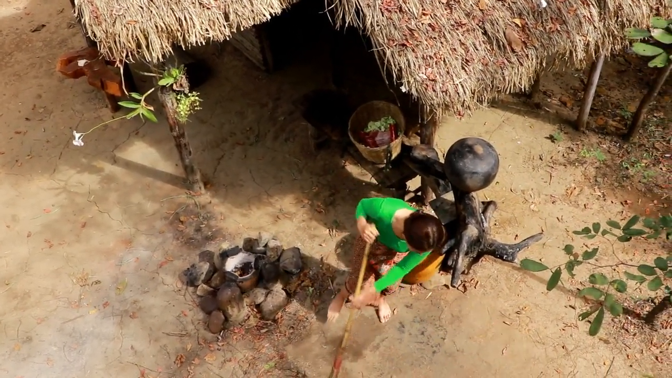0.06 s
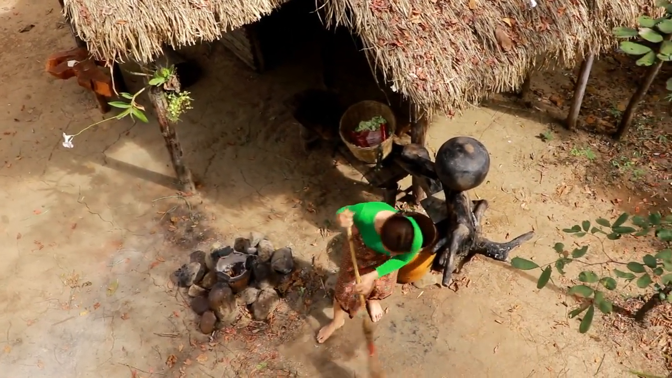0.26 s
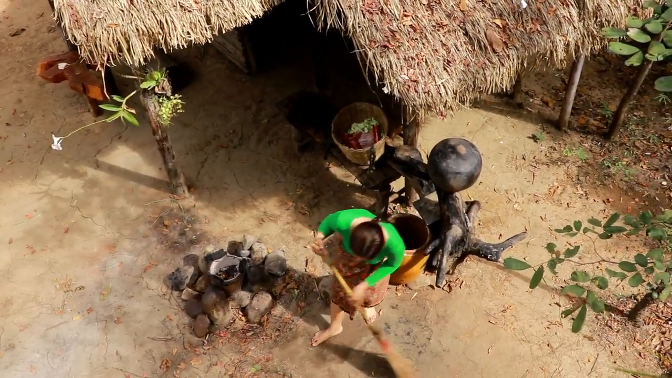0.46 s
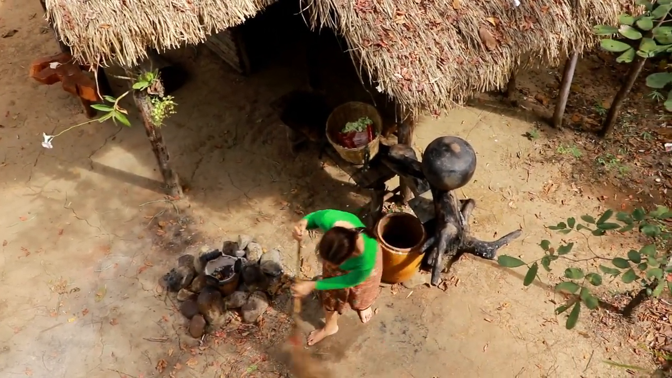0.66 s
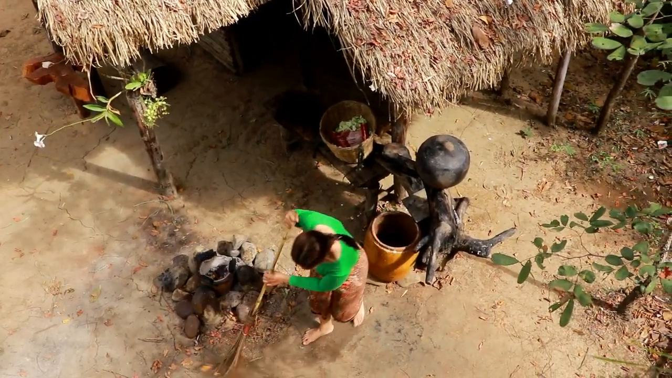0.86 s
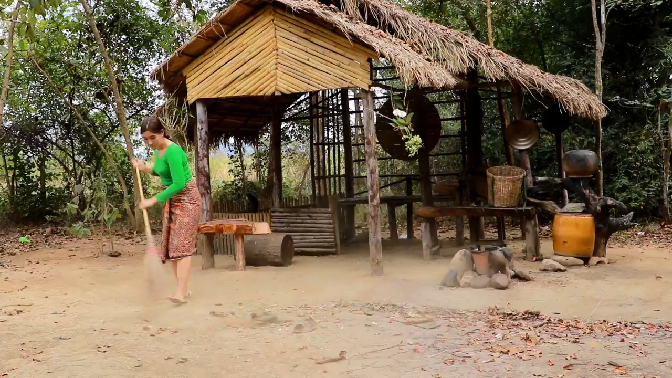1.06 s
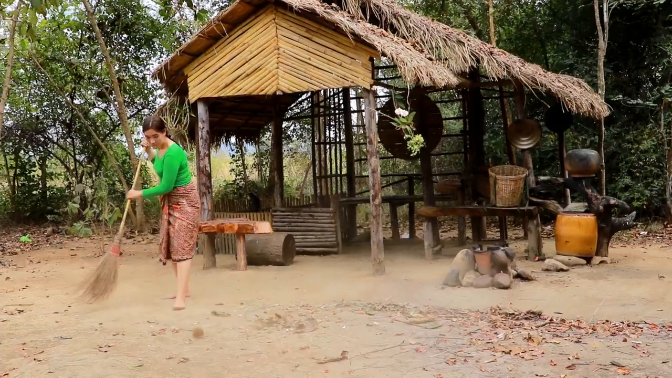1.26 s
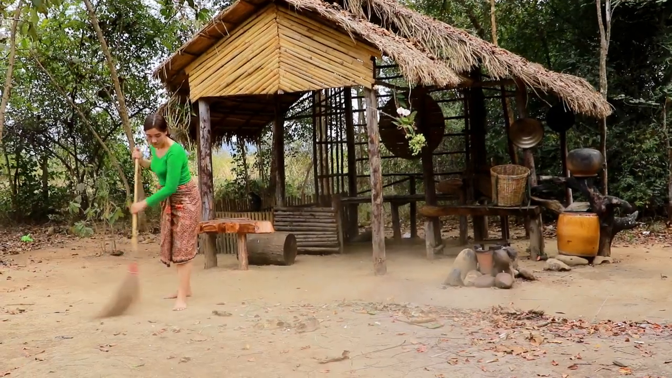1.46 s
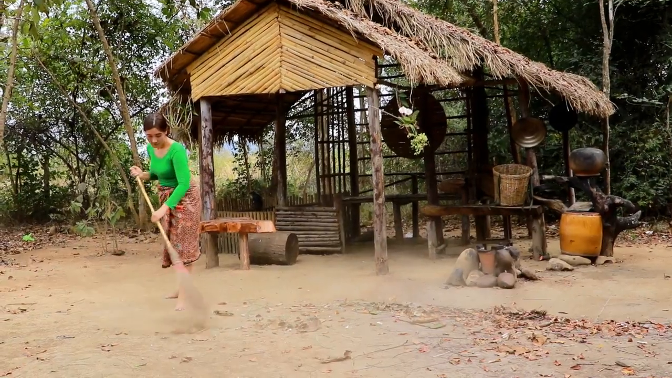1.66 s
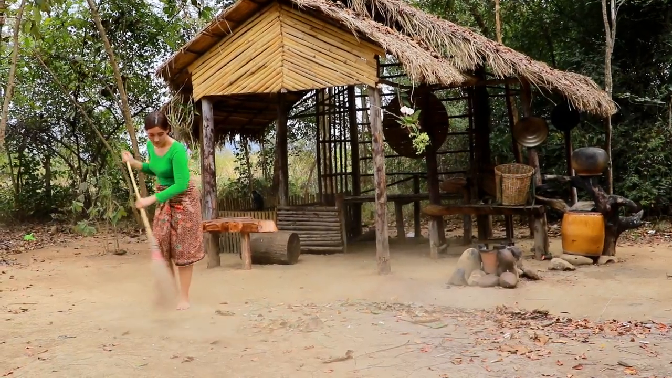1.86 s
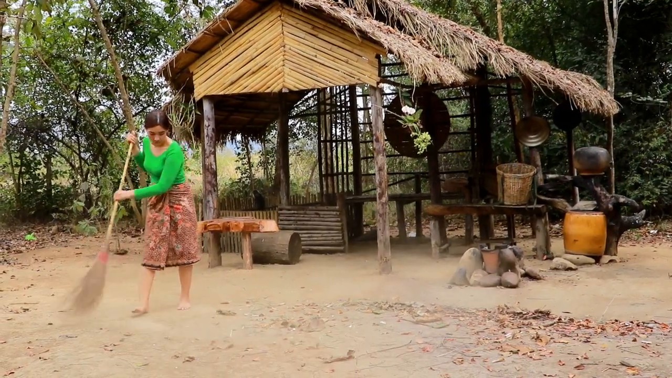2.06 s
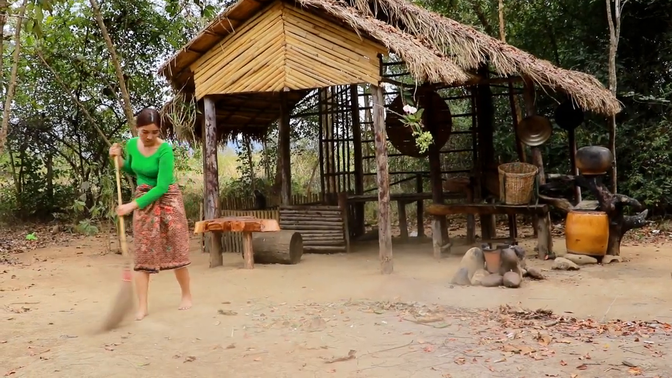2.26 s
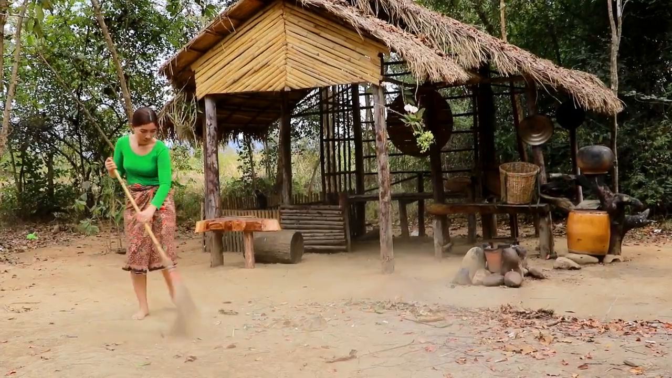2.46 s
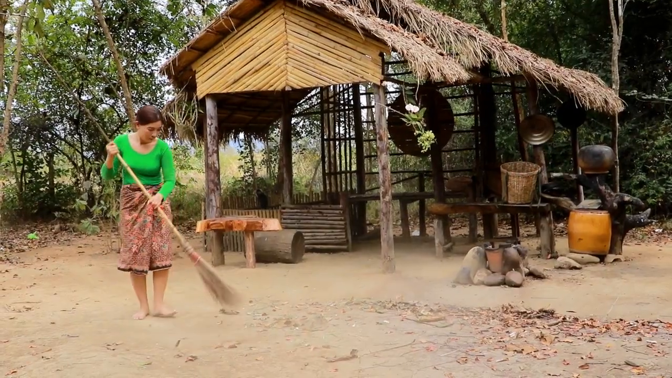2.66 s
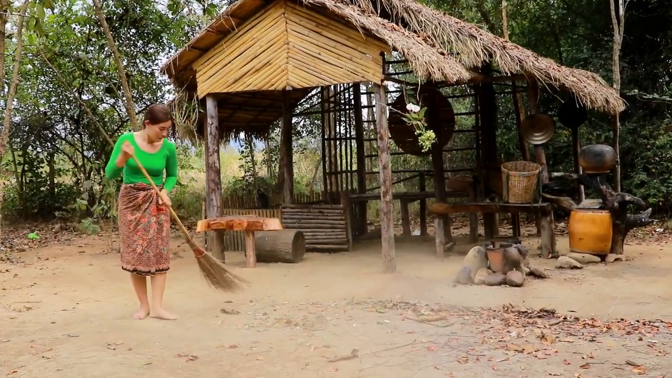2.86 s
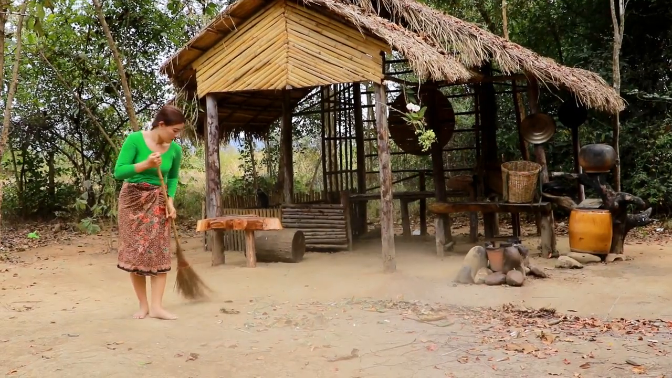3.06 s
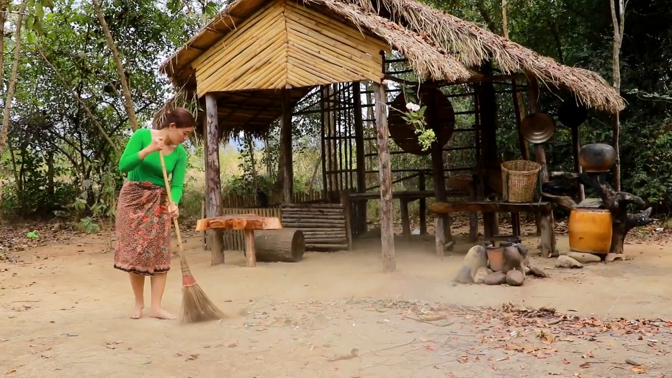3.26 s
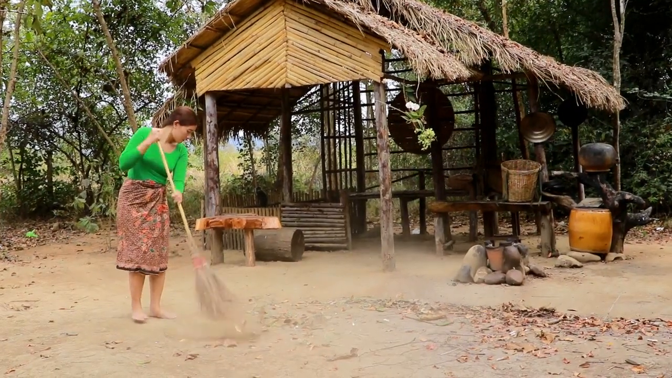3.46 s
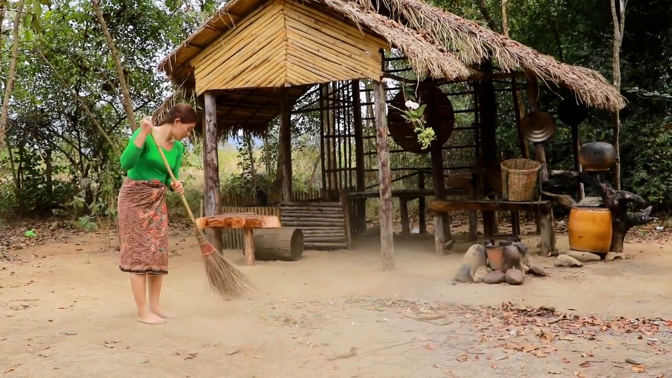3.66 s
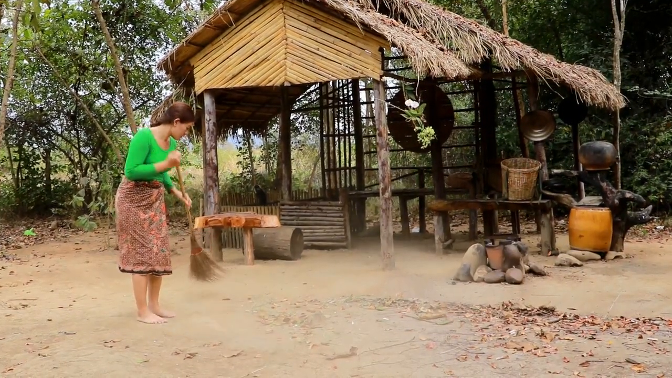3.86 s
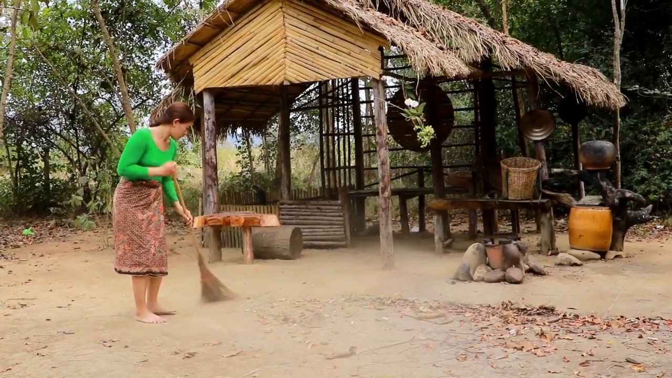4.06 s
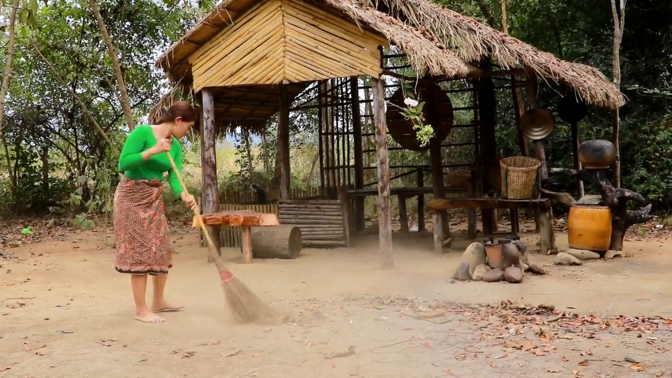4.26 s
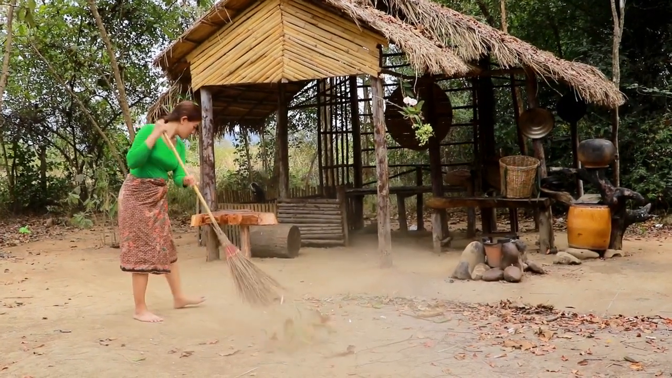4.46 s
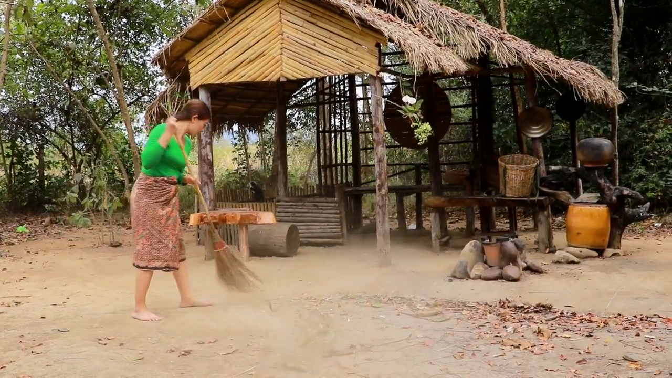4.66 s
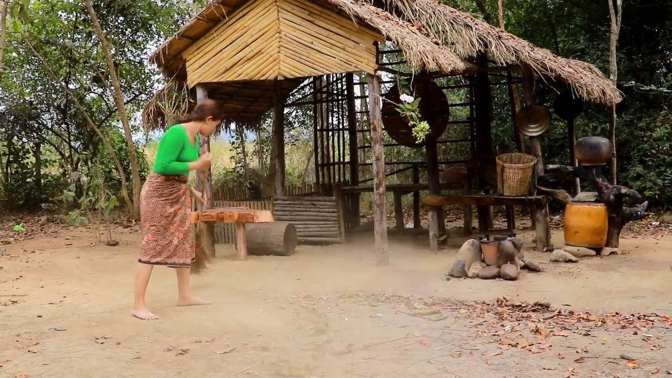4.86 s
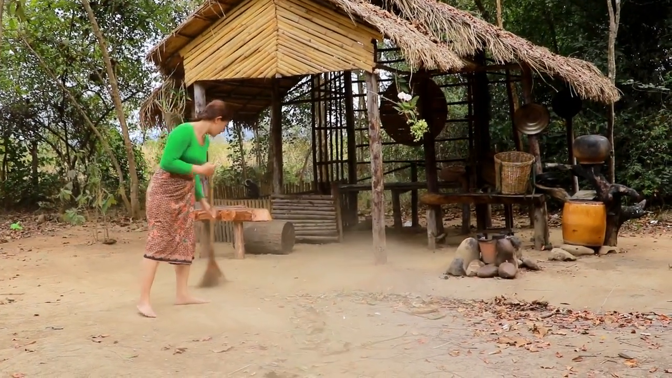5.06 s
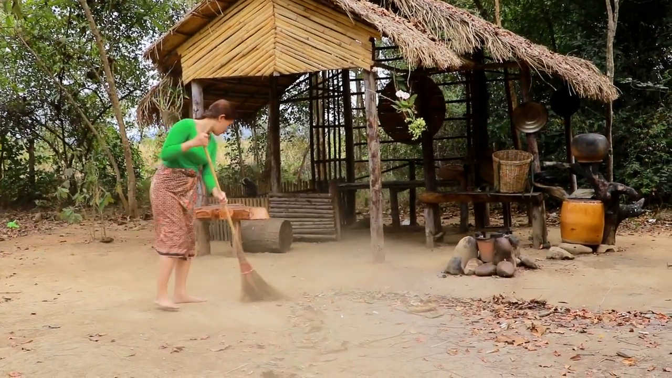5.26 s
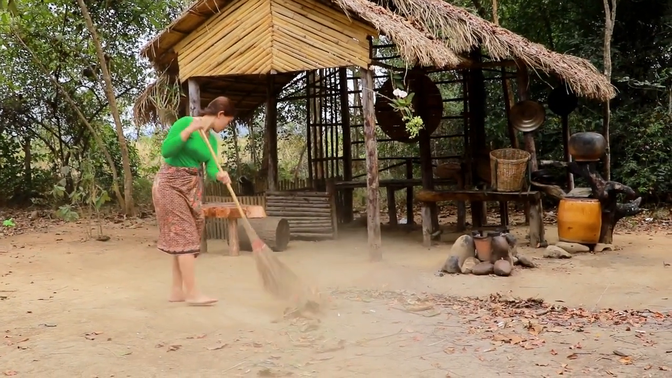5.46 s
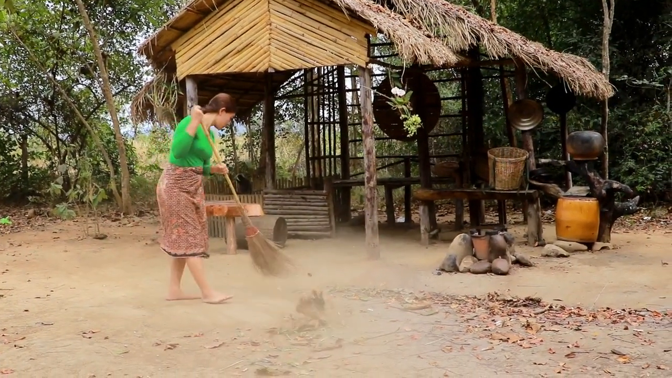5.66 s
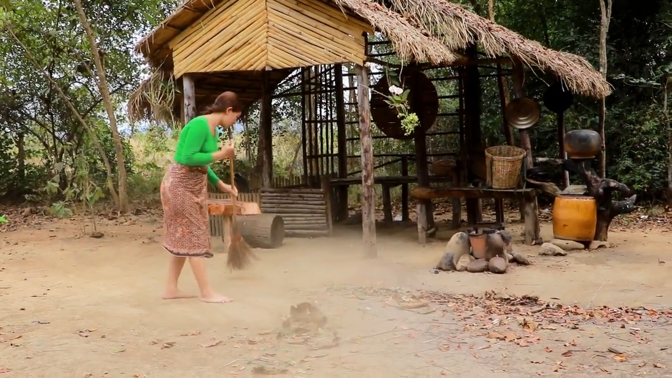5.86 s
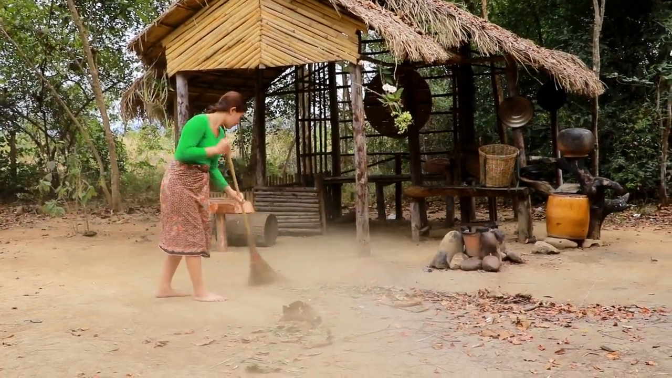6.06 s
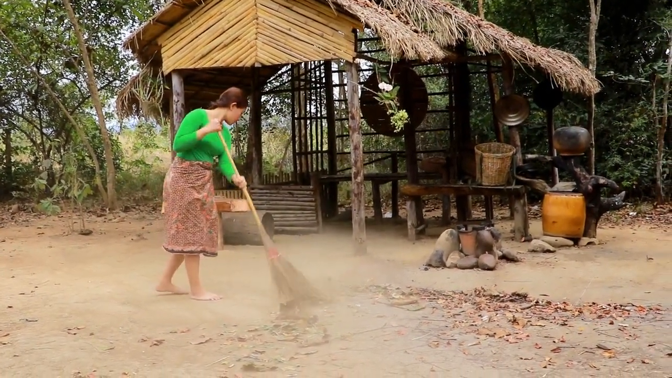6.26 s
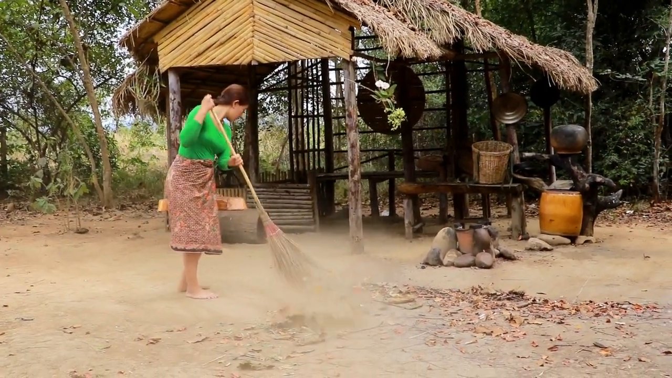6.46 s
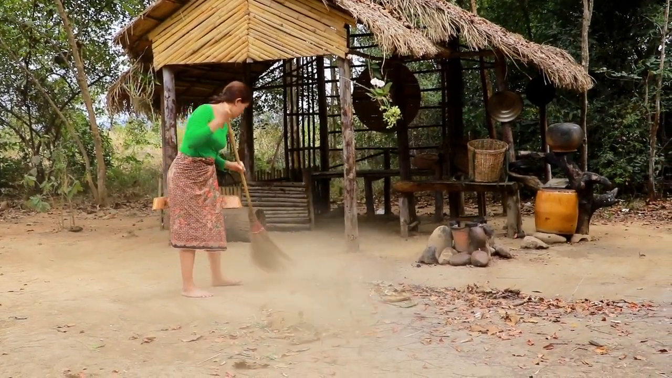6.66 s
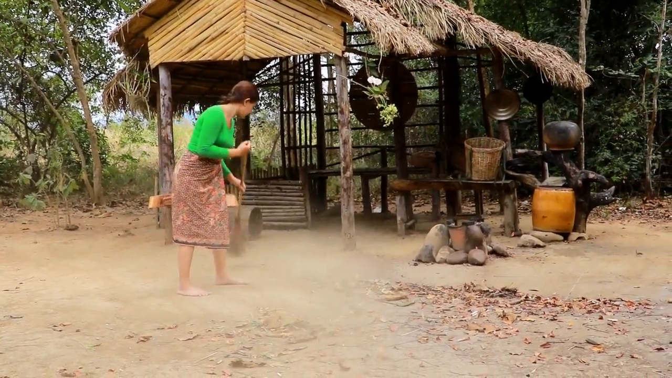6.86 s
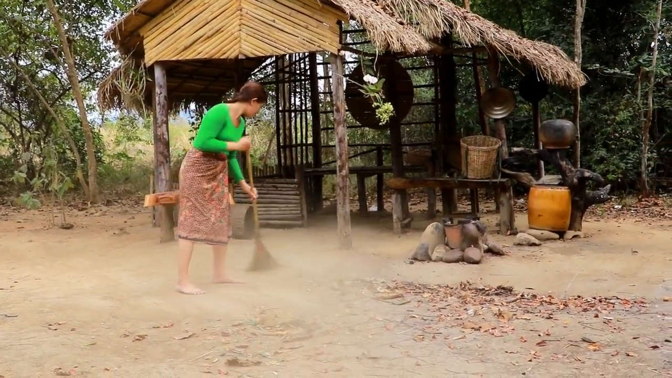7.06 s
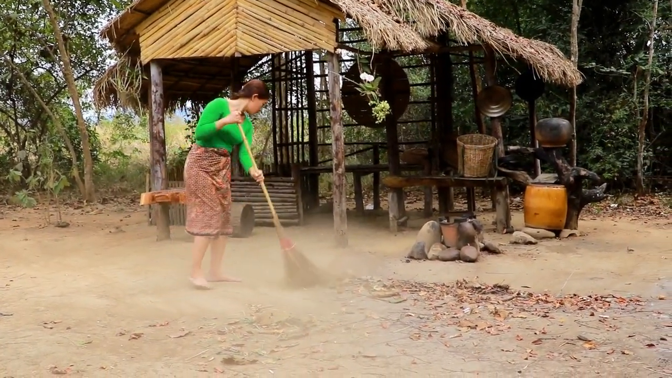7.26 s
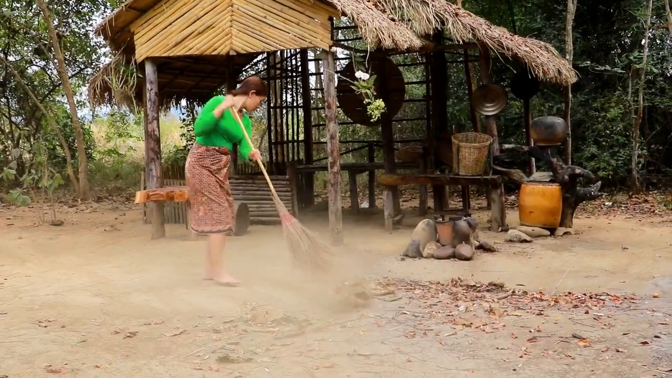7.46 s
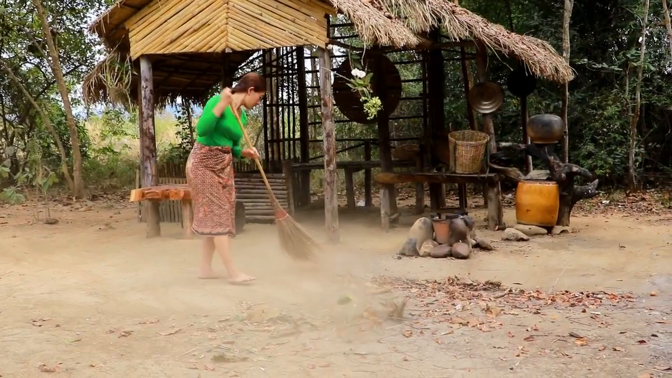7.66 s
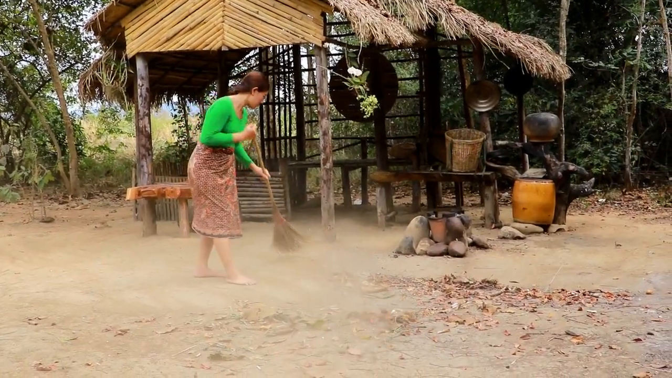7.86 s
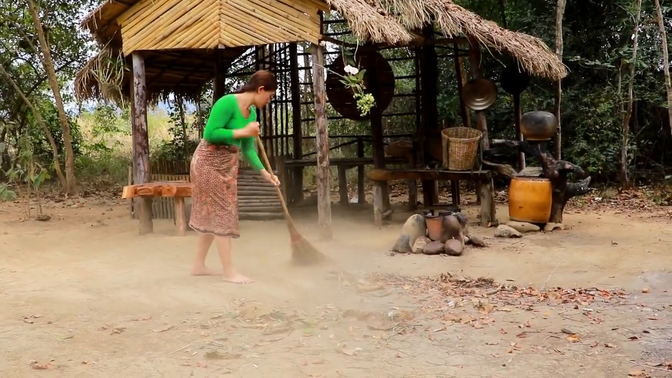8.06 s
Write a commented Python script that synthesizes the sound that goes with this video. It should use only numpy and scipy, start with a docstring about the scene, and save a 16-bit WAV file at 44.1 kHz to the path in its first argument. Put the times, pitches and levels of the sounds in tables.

```python
"""Sweeping a dirt yard

A soft grass broom sweeps a dry dirt yard, about one swish a second. Filtered random noise hisses and scrapes,
and tiny random impacts make the loose soil patter after each stroke. Short cracks are twigs, leaves and clods.
Soft low thuds and bumps, crowded into a rumble near the start, are dying low tones. Behind them lie a faint,
wavering low drone, soft air noise, and faint, thin high tones and bands made of narrow noise."""
import sys
import numpy as np
from scipy import signal
from scipy.fft import rfft, irfft
from scipy.io import wavfile
from scipy.ndimage import uniform_filter1d

SR = 44100
rng = np.random.default_rng(int(sys.argv[2]) if len(sys.argv) > 2 else 0)


def int16_out(signal):
    """Quantize to a 16-bit WAV file."""
    q = np.round(np.clip(np.atleast_2d(signal).T, -1, 1) * 32767)
    wavfile.write(sys.argv[1], SR, q.astype(np.int16))


N = 357321
TIME = np.arange(N) / SR

# strokes of the broom, levels before the final flutter and layer balance: (touch-down [s],
#   time to full pressure [s], time on the ground [s], hiss [dB], top of the hiss [dB], scrape [dB],
#   pushed soil [dB], trailing dirt [dB], settling of that dirt [dB/s])
STROKES = [(-.25, 0.11, 0.35, -26, -26, -24.5, -37, -40, 23),
           (0.534, 0.19, .39, -27.5, -30, -28, -37.5, -37, 31),
           (1.456, 0.26, 0.24, -25, -28.5, -25.5, -35, -37.5, 26),
           (2.239, 0.25, 0.33, -28.5, -32, -29, -37, -38.5, 30.5),
           (3.133, 0.2, 0.35, -25.5, -27.5, -26, -35, -38, 27),
           (4.075, 0.17, 0.29, -23.5, -24.5, -22.5, -31, -31.5, 29.5),
           (5.076, 0.32, 0.4, -23.5, -25, -23.5, -34.5, -37, 19),
           (6.02, 0.27, 0.33, -23.5, -25, -24.5, -34, -35.5, 22.5),
           (7.031, 0.32, 0.38, -25.5, -25.5, -26, -35.5, -31.5, 28),
           (8.014, 0.46, 0.28, -21, -25, -24, -30.5, -40, 25)]


def amp(db):
    """Turns decibels into a gain."""
    return 10 ** (np.asarray(db) / 20)


def unit(x):
    """Scales a sound to an average (rms) strength of 1."""
    return x / np.sqrt(np.mean(x ** 2) + 1e-20)


def curves(rows):
    """Joins each column of a time table by straight lines."""
    s, *columns = np.transpose(rows)
    return [np.interp(TIME, s, c) for c in columns]


def add(mix, s, sound):
    """Adds a sound to the mix at a time in seconds."""
    part = mix[max(round(s * SR), 0):][:len(sound)]
    part += sound[:len(part)]


def after_zero(start, x):
    """Cuts off the part of a sound that would come before time zero."""
    return x[max(round(-start * SR), 0):]


def colour(x, spectrum):
    """Filters a sound to a (frequency [Hz], level [dB]) spectrum, with no sound ahead of its cause."""
    hz, db = np.transpose(spectrum)
    f = abs(np.fft.fftfreq(8192, 1 / SR))
    log_gain = np.log(amp(np.interp(np.log(f + 1), np.log(hz), db)))
    # minimum phase: the filter answers as early as it can
    response = np.exp(np.conj(signal.hilbert(log_gain)))
    taps = np.fft.ifft(response).real[:len(f) // 2]
    return signal.oaconvolve(x, taps)[:len(x)]


def wander(hz, size=16384):
    """Slow random motion of rms 1; changes much faster than hz are weak."""
    step = N / SR / size
    spectrum = rfft(rng.standard_normal(size))
    slow = irfft(spectrum / (1 + (np.fft.rfftfreq(size, step) / hz) ** 2))
    return unit(np.interp(TIME, np.arange(size) * step, slow))


def grains(per_s, spread_db):
    """Tiny random impacts, mostly small and a few large, pushing either way."""
    chance = rng.random(N) * SR / per_s
    at = np.flatnonzero(chance < 1)
    size = amp(spread_db * np.minimum(-np.log(chance[at] + 1e-9), 4))
    sign = 2 * rng.integers(0, 2, N, dtype=np.int8)[at] - 1
    return unit(np.bincount(at, size * sign, N))


def blend(smooth, coarse, share):
    """Mixes two unrelated sounds; share is the coarse one's part of the power."""
    share = np.clip(share, 0, 1)
    return np.sqrt(1 - share) * smooth + np.sqrt(share) * coarse


def scatter(x, t60, delay_s):
    """A dying train of small, irregular repeats of a sound."""
    t = np.arange(SR // 2) / SR
    taps = rng.standard_normal(len(t)) * (rng.random(len(t)) < 2500 / SR) * (t > delay_s)
    taps = taps * amp(-60 * t / t60)
    return signal.oaconvolve(x, taps / np.linalg.norm(taps))[:N]


def resonate(x, hz, width):
    """One resonance, applied twice for steep flanks."""
    b, a = signal.iirpeak(min(hz, SR / 2.2), max(hz / width, .4), fs=SR)
    return signal.lfilter(b, a, signal.lfilter(b, a, x))


def note(s, length, hz, width, db):
    """A narrow, fuzzy sound of filtered noise that swells and fades around a moment."""
    swell = signal.windows.tukey(int(length * SR), .7)
    sound = amp(db) * swell * unit(resonate(rng.standard_normal(len(swell)), hz, width))
    start = s - length / 2
    return start, after_zero(start, sound)


def ring(modes, pitch=1):
    """A struck thing sounds as several tones that die away at their own speeds."""
    t = np.arange(SR // 2) / SR
    return sum(amp(db - 60 * t / t60) * np.sin(2 * np.pi * hz * pitch * t) for hz, db, t60 in modes)


def crack(level_db, t60, spectrum, crumble=0.35, crest=4.47):
    """One sharp impact, then a quickly dying burst of fractures."""
    t = np.arange(SR // 8) / SR
    decay = amp(-60 * t / t60)
    impact = 2.4 * (t == 0)
    fractures = crumble * rng.choice([-1, 1], len(t)) * decay
    burst = colour(fractures + impact, spectrum)
    # longer bursts carry more energy for the same level
    return amp(level_db) * burst / np.linalg.norm(burst) * 2 * np.linalg.norm(decay) / crest


def background():
    """Still outdoor air is filtered noise; the low drone is one tone whose pitch and level waver."""
    # a far, low drone, before its wavering and a small cut: (time [s], pitch [Hz], level [dB])
    drone_path = [(0, 62.8, -58), (1.2, 62, -51), (1.45, 69, -50.5), (2.3, 71.14, -49), (2.6, 73, -46.5),
                  (4.75, 76, -49), (5.7, 62, -60), (7, 62.5, -50), (8.1, 59, -54)]
    # colour of the air: (frequency [Hz], relative level [dB])
    air_colour = [(12, -2), (22, 1.5), (33, -6.5), (50, -6), (100, -3.5), (160, -10.5), (300, -18),
                  (700, -22.5), (1300, -23), (3000, -37), (8000, -30), (15000, -35)]
    hz, db = curves(drone_path)
    drone = np.sin(2 * np.pi * np.cumsum(hz + 0.84 * wander(hz=5.4)) / SR)
    drone = unit(drone) * amp(db - 0.5 + 0.89 * wander(hz=4.4))
    air = amp(-50) * unit(colour(rng.standard_normal(N), air_colour))
    return drone + air


def high_tones():
    """Faint, thin high tones and narrow bands of noise, each swelling and fading."""
    # (middle [s], length [s], pitch [Hz], width of the resonance [Hz], level before the fades [dB])
    high_bands = [(0.408, 0.76, 9800, 1600, -48), (2.21, .1, 12700, 400, -58),
                  (3.888, 0.045, 13100, 200, -51), (3.977, .08, 12540, 300, -55),
                  (5.0, 0.18, 12300, 250, -67), (7.46, 2, 10930, 70, -59)]
    out = np.zeros(N)
    for row in high_bands:
        add(out, *note(*row))
    return out


def low_thuds(press_s=0.0023, soft_hz=375):
    """Low tones swell in over a few milliseconds and die away; lower thuds are also duller."""
    # soft low thuds and bumps, crowded into a rumble near the start:
    #   (time [s], peak [dB], deep part [dB], pitch factor)
    thuds = [(.650, -38, -12, .85), (0.718, -33.5, -21, .87), (.776, -40, -12, 0.86),
             (0.817, -32, -23, .85), (.885, -38, -12, 0.81), (1.011, -35, -18, .85),
             (1.138, -34.5, 4, 1.02), (1.375, -36.5, -15, .97), (1.468, -34.5, 4, 1.35),
             (2.003, -30.5, 0, 1.07), (2.632, -33, 6, 0.95), (3.212, -37.5, 9, .95), (3.343, -31, 4, .96),
             (3.663, -36, 5, 0.95), (4.219, -24, -2, .96), (4.601, -24, 5, 0.93), (4.909, -25.5, -10, 0.92),
             (5.079, -24.5, -0.5, 0.93), (5.353, -31.5, 0, 1.04), (6.036, -28.5, -2, 0.9),
             (6.327, -24.5, 1, 0.91), (6.503, -29, -4, 0.91), (6.832, -29.5, -8, 0.97),
             (7.245, -29, -1, 0.9), (7.898, -29.5, -5, 0.92)]
    # tones of a thud, before the pitch factor: (frequency [Hz], level [dB], time to fall 60 dB [s])
    thud_modes = [(145, -2.5, 0.063), (205, 5, 0.051), (283, 1.5, 0.049), (331, -8.5, 0.079)]
    # deep tones, same pitch in every thud: (frequency [Hz], level [dB], time to fall 60 dB [s])
    deep_modes = [(49.6, -8.5, 0.44), (108, -6, 0.23)]
    out = np.zeros(N)
    for s, db, deep_db, pitch in thuds:
        thud = ring(thud_modes, pitch) + amp(deep_db) * ring(deep_modes)
        press = 1 - np.exp(-np.arange(len(thud)) / SR / press_s)
        soft = signal.butter(6, soft_hz * pitch ** 3, fs=SR, output="sos")
        thud = signal.sosfilt(soft, thud * press)
        add(out, s, -amp(db) * thud / abs(thud).max())
    return out


def tick(db, hz, t60):
    """A small dry crack with a broad peak at its own pitch."""
    return crack(db, t60, [(hz / 12, -20), (hz / 2.14, -4), (hz, 0), (hz * 1.78, -5), (hz * 5, -22)])


def small_ticks(level_db=-24.0, spread_db=2, centre_hz=3600, spread_octaves=0.46, t60=0.0061,
                within_s=.55, fade_db_per_s=9, count=6):
    """After each lift-off a few small scraps land at random moments, later ones softer on average."""
    out = np.zeros(N)
    for start, _, ground_s, *_ in STROKES:
        moments = within_s * rng.random(count)
        for when, size, pitch in zip(moments, *rng.standard_normal((2, count))):
            db = level_db + spread_db * size - fade_db_per_s * when
            hz = centre_hz * 2 ** (spread_octaves * pitch)
            add(out, start + ground_s + when, tick(db, hz, t60))
    return out


def debris():
    """Twigs, pebbles and clods crack as short noise bursts; a snapping stem rings in dying tones."""
    # larger twigs, leaves and pebbles flicked by the broom:
    #   (time [s], level [dB], centre [Hz], time to fall 60 dB [s])
    flicked = [(.921, -11.5, 3050, .014), (1.053, -17, 6600, 0.029), (1.163, -24.5, 5000, .05),
               (1.248, -25, 3500, 0.013), (1.829, -20, 3500, .03), (1.854, -18, 1660, 0.033),
               (2.010, -21.5, 3000, .017), (2.763, -17, 2750, 0.008), (2.843, -26, 2150, .016),
               (2.964, -27, 2000, 0.056), (2.980, -23, 3200, .02), (3.809, -22, 3500, 0.027),
               (4.040, -18, 5440, .005), (4.711, -17.5, 3800, .03), (4.758, -17, 4570, 0.014),
               (4.911, -17.5, 3580, 0.012), (5.815, -18, 3920, 0.026), (5.852, -15.5, 4900, 0.016),
               (6.671, -20, 5040, 0.013), (6.745, -15.5, 3900, 0.0095), (6.909, -10, 1620, 0.0078),
               (6.96, -21, 3850, 0.02), (6.981, -21, 3800, 0.0058), (7.02, -24, 3970, 0.022),
               (7.062, -10.5, 4550, 0.0077), (7.631, -11.5, 3160, 0.007), (7.917, -16.5, 1170, 0.015)]
    # clods of earth tumble and crumble: (time [s], level [dB], time to fall 60 dB [s])
    clods = [(5.527, -11.5, 0.0081), (5.556, -23, 0.14), (5.572, -21.5, 0.12), (5.721, -22.5, 0.065),
             (6.4239, -6, 0.027), (6.4303, -11, 0.031), (6.4388, -8, 0.034), (6.4547, -8.5, 0.021),
             (6.460, -14, 0.045), (6.4671, -11.5, 0.068), (6.482, -18, 0.027)]
    # colour of the clods: (frequency [Hz], relative level [dB])
    clod_colour = [(100, -13), (300, -3.5), (570, -2.5), (850, -1.5), (1400, 2), (2050, -4), (2700, -11),
                   (5000, -12), (9000, -19), (15000, -42)]
    # a dry stem snaps in three quick cracks: (time [s], peak [dB])
    snaps = [(3.9261, -11), (3.9270, -9.5), (3.9286, -10)]
    # tones of the stem: (frequency [Hz], relative level [dB], time to fall 60 dB [s])
    stem_modes = [(3490, 0, 0.019), (3800, 3, 0.007), (4700, 4, 0.0053), (5200, -2, 0.0034),
                  (6300, -10, .002), (8800, -23, .002)]
    out = small_ticks()
    for s, db, hz, t60 in flicked:
        add(out, s, tick(db, hz, t60))
    for s, db, t60 in clods:
        add(out, s, crack(db, t60, clod_colour))
    stem = ring(stem_modes)
    for s, db in snaps:
        add(out, s, amp(db) * stem / abs(stem).max())
    return out


def crackle(low_hz, high_hz, per_s, spread_db, sharpness, count=7, skitter_db=-9):
    """Crumbs and leaf scraps of many sizes: each size ticks at its own pitch, then skitters briefly."""
    pitches = np.geomspace(low_hz, high_hz, count)
    ticks = sum(unit(resonate(grains(per_s / count, spread_db), hz, hz / sharpness)) for hz in pitches)
    return unit(ticks + amp(skitter_db) * scatter(ticks, t60=0.032, delay_s=0.00088))


def shimmer(x, patchy_db, size=512):
    """Different bristles touch from moment to moment, so the colour shifts in patches."""
    z = signal.stft(x, nperseg=size)[2]
    # random gains, smoothed over pitch and then over time
    patches = uniform_filter1d(rng.standard_normal(z.shape), size=9, axis=0)
    patches = uniform_filter1d(patches, size=8, axis=1)
    return unit(signal.istft(z * amp(patchy_db * unit(patches)), nperseg=size)[1][:N])


def pressure(levels_db, build_db):
    """Gain of one layer through all strokes: bristles land, press harder by build_db, ease off and lift."""
    land_s, sag_db_per_s, lift_db_per_s = .06, 14, 135
    power, t = np.zeros(N), np.arange(SR) / SR
    for (start, full_s, ground_s, *_), db in zip(STROKES, levels_db):
        db = db - build_db * np.maximum(1 - t / full_s, 0) ** 1.51
        db = db - sag_db_per_s * np.maximum(t - full_s, 0)
        db = db - lift_db_per_s * np.maximum(t - ground_s, 0)
        gain = np.minimum(t / land_s, 1) * amp(db)
        add(power, start, after_zero(start, gain) ** 2)
    return np.sqrt(power)


def trail(linger=1):
    """Gain of the dirt each stroke gathers and flings on; it settles after lift-off, slower if it lingers."""
    power, t = np.zeros(N), np.arange(2 * SR) / SR
    for start, _, ground_s, *_, db, settle_db_per_s in STROKES:
        settled_db = settle_db_per_s / linger * np.maximum(t - ground_s, 0)
        gain = np.minimum(t / ground_s, 1) ** 2 * amp(db - settled_db)
        add(power, start, after_zero(start, gain) ** 2)
    return np.sqrt(power)


def clumps(per_s=45, die_s=0.012, share=0.35):
    """Gain of dirt landing in clumps: each starts at once and trickles away."""
    landings = np.minimum(rng.exponential(1, N), 3) * (rng.random(N) < per_s / SR)
    power = signal.lfilter([1], [1, -np.exp(-1 / SR / die_s)], landings)
    share = np.clip(share, 0, 1)
    return np.sqrt(1 - share + share * power / power.mean())


def broom(loose_share=0.4, pressed_share=0.04, top_hz=10000, loose_soil=0.72,
          trail_top_db=-4, trail_scrape_db=0.5, trail_soil_db=-6):
    """Pressed bristles give countless tiny slips; as they lift, separate grains of soil are heard."""
    # colours of bristle hiss, scrape, rubbed soil and rolling soil: (frequency [Hz], relative level [dB])
    hiss_colour = [(4500, -30), (6000, -25.5), (6700, -15.5), (7600, -2.5), (8250, 1.5), (8850, 1.5),
                   (9500, -3), (10800, -9), (12000, -5), (13700, -3.5), (15500, -10)]
    scrape_colour = [(1300, -20), (1900, -2.5), (2300, -4.5), (2850, -2), (3600, -0.5), (4200, 0),
                     (4800, 0), (5900, 1), (6500, -5), (7500, -1.5), (10000, -42)]
    rubbed_colour = [(150, -23), (350, -11.5), (600, -10), (900, -4.5), (1300, 0.5), (1730, 2.5),
                     (2250, -7), (3200, -24.5)]
    rolling_colour = [(90, -20), (170, -6.5), (350, -3), (600, -7), (1100, 0), (1600, 1), (2200, -10.5),
                      (3500, -18), (7000, -36)]
    # a bundle of bristles rasps at its own pitch:
    #   (middle [s], length [s], pitch [Hz], level before the fades [dB])
    rasps = [(0.038, 0.092, 5860, -30), (0.034, 0.13, 1870, -39), (0.794, 0.29, 1510, -45),
             (2.52, .22, 1710, -40), (3.402, .2, 1650, -47), (4.192, 0.11, 4580, -24.5),
             (5.391, 0.15, 1760, -33)]
    hiss_db, top_db, scrape_db, soil_db = np.transpose(STROKES)[3:7]
    pressed = pressure(hiss_db, build_db=13.0)
    landing = clumps()
    dirt = trail() * landing
    loose = dirt ** 2 / (dirt ** 2 + pressed ** 2 + 1e-12)
    share = pressed_share + (loose_share - pressed_share) * loose

    # sharp sand grains sound in both the hiss and the scrape
    sand = grains(per_s=4000, spread_db=8.5)
    slips = shimmer(grains(per_s=20000, spread_db=0.0), patchy_db=1.16)
    hiss = unit(colour(blend(slips, sand, 1.1 * share), hiss_colour))
    # only fast bristles make the very top of the hiss
    high_pass = signal.butter(4, top_hz, "high", fs=SR, output="sos")
    top = signal.sosfiltfilt(high_pass, hiss)

    leaf_scraps = crackle(2200, 8100, per_s=650, spread_db=5.5, sharpness=1.27)
    scraps = blend(leaf_scraps, sand, 0.6)
    scratches = shimmer(grains(per_s=12000, spread_db=0.0), patchy_db=1.27)
    scrape = unit(colour(blend(scratches, scraps, share), scrape_colour))

    # soil rubs under the broom, then rolls on and settles in duller crumbs
    rubbed = shimmer(grains(per_s=6000, spread_db=2.0), patchy_db=3.5)
    rubbed = unit(colour(rubbed, rubbed_colour))
    crumbs = crackle(550, 1540, per_s=300, spread_db=3.5, sharpness=0.88)
    rolling = unit(colour(grains(per_s=3000, spread_db=0.5), rolling_colour))
    soil = blend(rubbed, blend(rolling, crumbs, 0.56), loose_soil * loose + 0.048)

    # the tips hiss first; scrape and soil build later, and heavy crumbs roll longest
    top_gain = np.hypot(pressure(top_db, build_db=8), amp(trail_top_db) * dirt)
    hiss = (hiss - top) * np.hypot(pressed, dirt) + top * top_gain
    scrape = scrape * np.hypot(pressure(scrape_db, build_db=12.5), amp(trail_scrape_db) * dirt)
    heavy_dirt = trail(linger=1.29) * landing
    soil = soil * np.hypot(pressure(soil_db, build_db=16), amp(trail_soil_db) * heavy_dirt)

    # bundles of bristles catch and let go, so each sound flutters, and then all together
    out = hiss * amp(1.07 + 0.5 * wander(hz=44))
    out = out + scrape * amp(0.11 + 0.42 * wander(hz=35))
    out = out + soil * amp(0.5 * wander(hz=40))
    out = out * amp(0.5 * wander(hz=45))
    for s, length, hz, db in rasps:
        add(out, *note(s, length, hz, 0.34 * hz, db))
    return out


def scene():
    """Everything sits in the centre; a faint, steady noise differs between the ears."""
    hits = debris() + low_thuds()
    echoes = scatter(hits, t60=0.58, delay_s=0.015)  # from the hut and the trees
    mid = background() + high_tones() + hits + amp(-12.5) * echoes + broom()
    side_colour = [(50, -5), (400, 6.5), (1200, -11.5), (7000, -20.0), (12000, -7.5)]  # (Hz, dB)
    side = amp(-74.5) * unit(colour(rng.standard_normal(N), side_colour))
    return np.array([mid + side, mid - side])


def record(dry):
    """A steep low-pass filter takes away the highest treble."""
    edge_hz = 15850
    taps = signal.firwin(801, edge_hz, window=("kaiser", 9), fs=SR)
    return signal.oaconvolve(dry, taps[None], "same")


dry = scene()
out = record(dry)
int16_out(out)
```